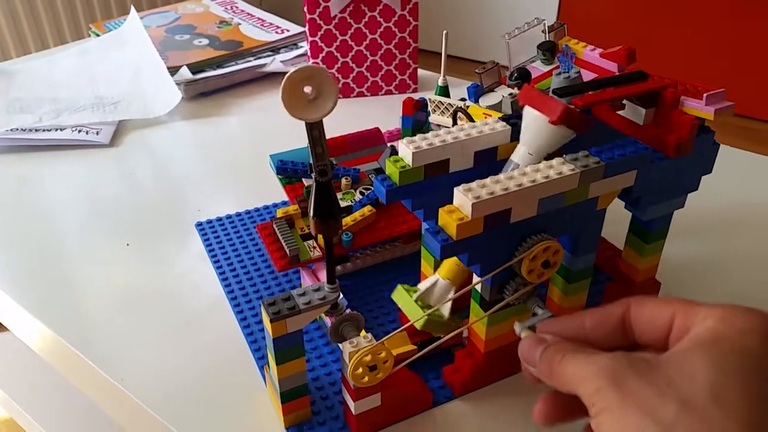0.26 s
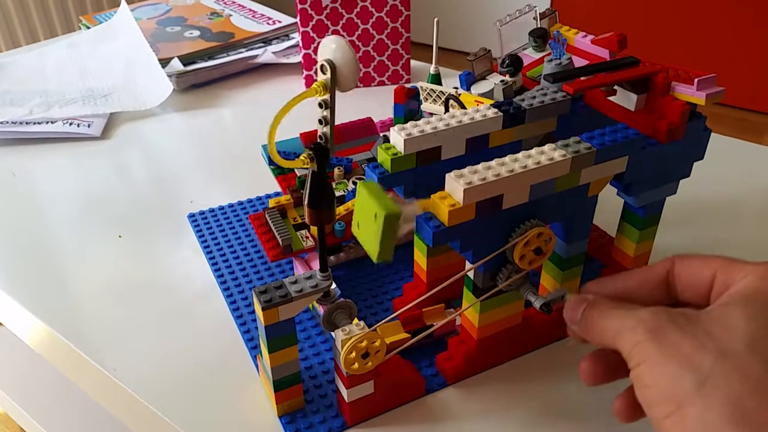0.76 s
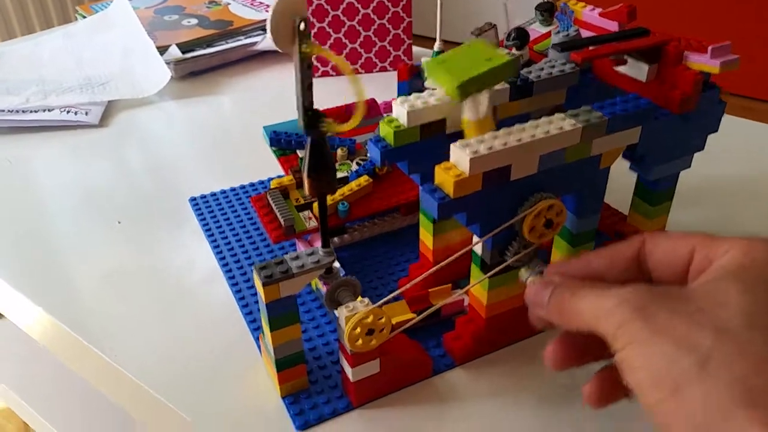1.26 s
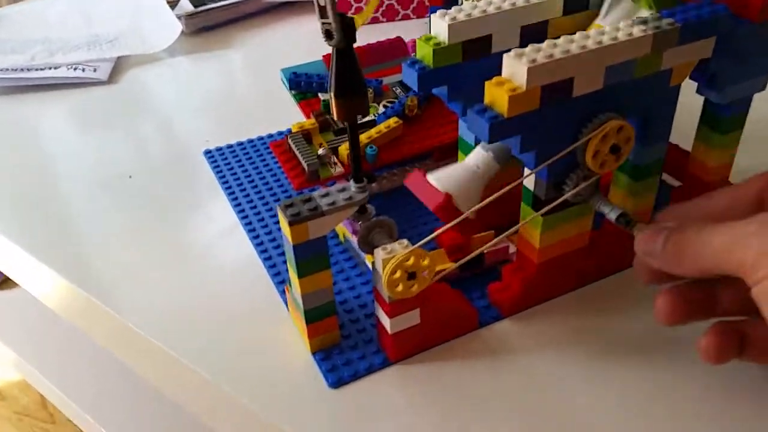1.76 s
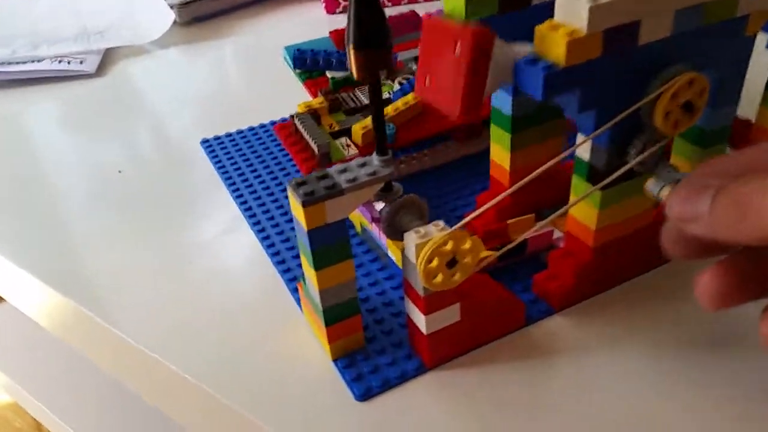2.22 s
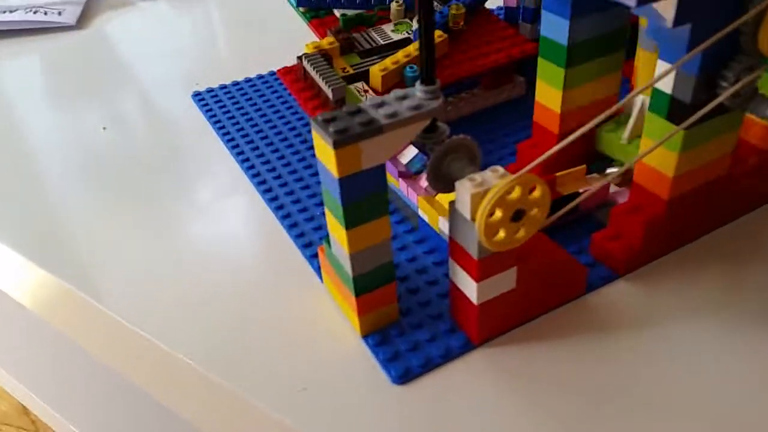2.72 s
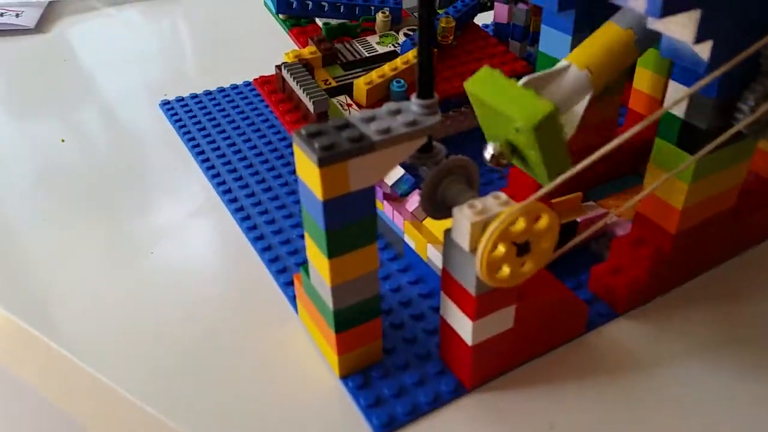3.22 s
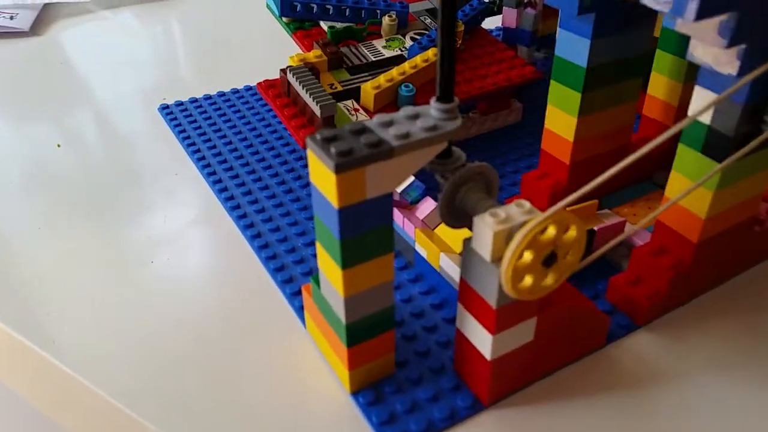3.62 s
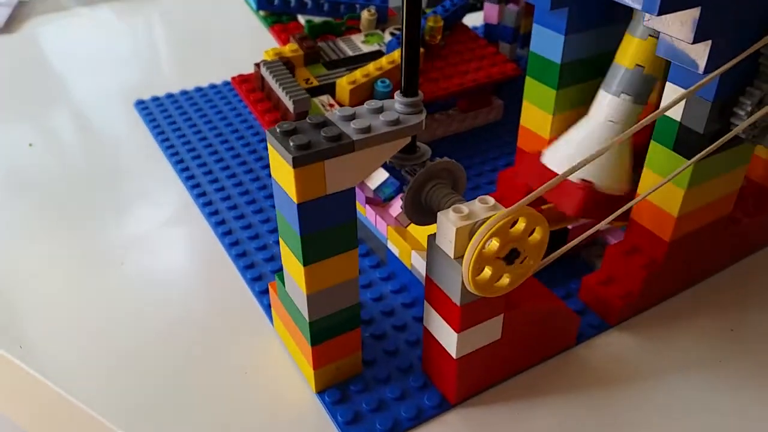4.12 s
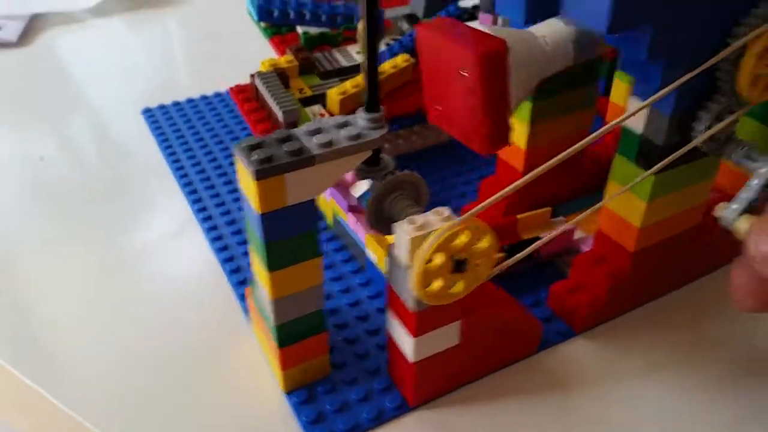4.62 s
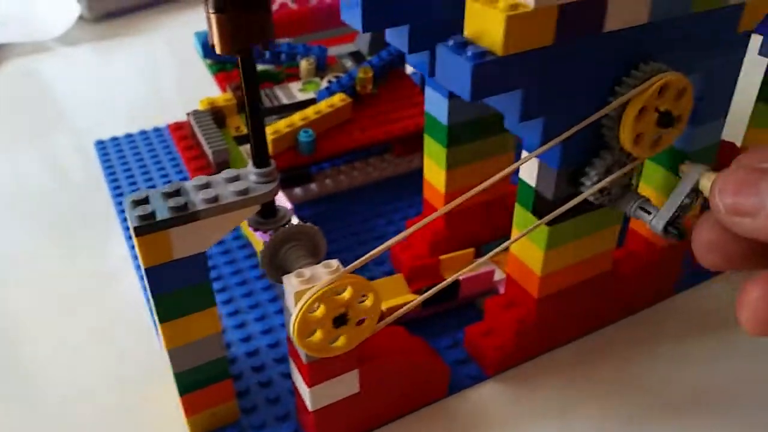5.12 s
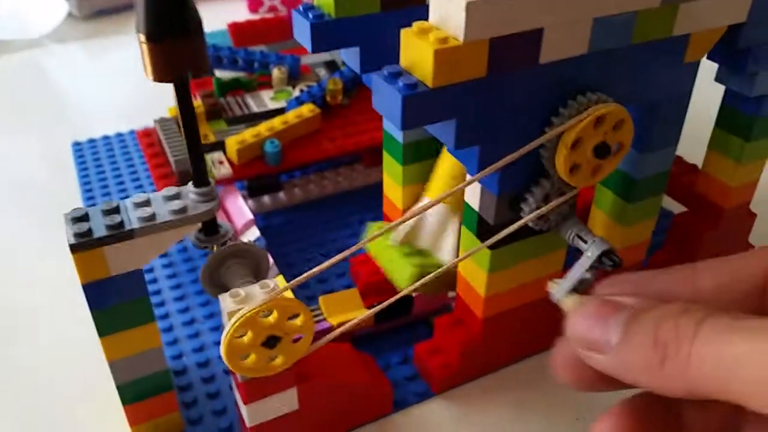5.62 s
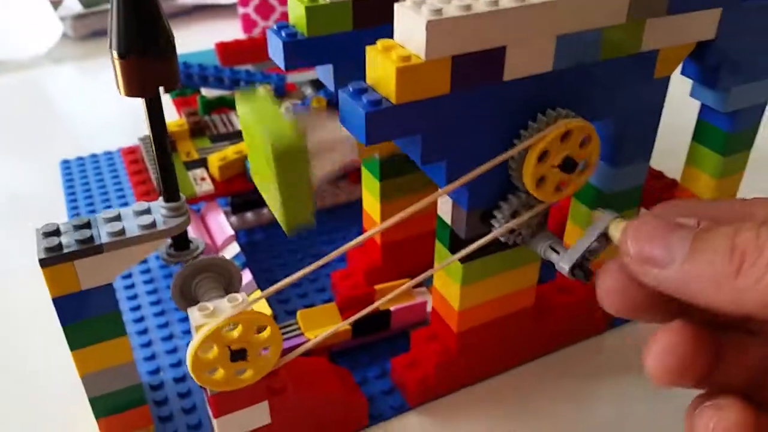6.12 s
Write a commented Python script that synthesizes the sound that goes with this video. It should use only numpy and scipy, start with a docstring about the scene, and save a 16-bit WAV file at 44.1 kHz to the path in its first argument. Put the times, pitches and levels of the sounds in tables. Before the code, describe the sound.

Close-up rattling of a cranked plastic brick mechanism: scattered clacks, a dense burst of dry raps, a near-quiet stretch, then squeaky clatter again.

```python
"""Plastic hammers knock, clack and rebound on a toy-brick machine cranked by hand in a small room, close by.
Gear teeth tick, axles rub and sliding hammers squeak between the blows; a low rumble and faint hiss lie below.
Blows are decaying noise bursts through resonances, with a diffuse room tail; plate and knocks are decaying sines.
Squeaks are narrow-band noise; gears and axles are slip-modulated noise; rumble and hiss are shaped noise."""
import sys
import numpy as np
from scipy import signal
from scipy.fft import rfft, irfft
from scipy.io import wavfile

SR = 44100
rng = np.random.default_rng(int(sys.argv[2]) if len(sys.argv) > 2 else 0)


def wrap_up_sound(samples):
    """Save the sound to the file named by the first command line argument, as 16-bit audio."""
    columns = np.atleast_2d(samples).T
    # keep every value between -1 and 1, then stretch to whole-number steps
    tamed = np.clip(columns, -1, 1)
    steps = np.round(tamed * 32767).astype(np.int16)
    wavfile.write(sys.argv[1], SR, steps)


N = 280917
CUTOFF_HZ = 16000
SIDES = np.array([[1], [-1]])   # left, right

# blows: t/s, level/dB, weight/dB, brightness/dB, pan/dB (x0.52 per side), hollow f/Hz, ping f/Hz,
# first rebound gap/s, change per rebound/dB
# short, dry raps on the bricks
RAPS = [(1.9602, -16, -4, 5, 1, 870, 3180, .023, -7.5), (1.993, -23, -2.5, 2.5, -1, 870, 3080, 0.018, -5.5),
        (2.032, -27, -5.5, 1, 1, 2280, 3070, 0.011, -7.5),
        (2.092, -17, -7.5, 1.5, -0.5, 1080, 3800, .013, -19.5),
        (2.175, -16.5, -2.5, 1, -2, 1310, 3360, 0.015, -10),
        (2.204, -30, -1, -9.5, -4, 1240, 3290, .019, -3), (2.243, -28.5, -7, -5, 0, 830, 3100, .015, -19),
        (2.365, -21, 0.5, -5, 2, 1660, 3630, .012, -10.5),
        (2.466, -34.5, 10.5, 6.5, 3.5, 837, 4500, .017, -8.5),
        (2.541, -22, -7, -0.5, 0.5, 820, 4370, 0.032, -14.5),
        (2.59, -31, -3.5, 3.5, -2, 820, 4570, .048, -10), (2.69, -30.5, -5, -5, 3.5, 1410, 5000, .012, -6),
        (2.78, -31.5, 1, -4, -0.5, 810, 3040, .015, -18),
        (2.825, -24, 1, -7.5, -2.5, 820, 3000, 0.013, -18), (2.966, -28, 0, 2, 3.5, 783, 11200, 0.013, -17)]
# heavy hammer falls with a hollow thunk, same columns
THUNKS = [(4.25, -33, 3, -5.5, -3.5, 870, 3670, 0.017, -19),
          (4.286, -32.5, 3, -2, 1, 885, 6300, 0.017, -26),
          (4.309, -29.5, -5, -1, -3, 420, 7100, 0.017, -7.5),
          (4.424, -36, -6, 2.5, -5, 466, 5900, .008, -9), (4.447, -41.5, -0.5, 5.5, 0, 262, 7200, .02, -27),
          (5.595, -35.5, -3.5, -3.5, 0.5, 447, 3050, 0.046, -8.5)]


def from_db(db):
    """Decibels to amplitude gain."""
    return 10 ** (np.asarray(db) / 20)


def rms_one(x):
    """Scale to unit rms."""
    return x / np.sqrt(np.mean(x ** 2) + 1e-20)


def at_hz(points, hz):
    """Interpolate (f/Hz, value) rows over log frequency."""
    table_hz, values = np.array(points).T
    return np.interp(np.log(hz + 1e-6), np.log(table_hz), values)


def band(x, low_hz, high_hz):
    """Causal Butterworth band-pass."""
    sos = signal.butter(2, [low_hz, high_hz], "band", fs=SR, output="sos")
    return signal.sosfilt(sos, x)


def dying(t, t60):
    """Exponential envelope, -60 dB after t60 seconds."""
    return np.exp(-np.log(1000) * t / np.maximum(t60, 1e-3))


def resonate(x, hz, width_hz):
    """Two-pole resonance with gain 1 at its top."""
    r = np.exp(-np.pi * width_hz / SR)
    b = [(1 - r * r) / 2, 0, (r * r - 1) / 2]
    a = [1, -2 * r * np.cos(2 * np.pi * hz / SR), r * r]
    return signal.lfilter(b, a, x)


def contacts(tap_db, crack_db, rebound_db, crack_t60, blow_s):
    """A contact is a hard tap and crack, then the dense, damped ringing of many joined bricks."""
    # frequency zones: low f/Hz, high f/Hz, gain/dB, ring length factor, side share, room/dB
    zones = [(136, 610, -2, 1.53, 0.052, -7.5), (670, 1527, -4, 1.3, 0.41, -10.5),
             (1143, 2390, -5.5, 0.88, 0.96, -9), (3190, 6140, -4, 0.71, 1, -8.5),
             (7200, 16000, -6, 0.38, 0.91, -7.5)]
    hits = strikes()
    t = np.arange(SR // 14) / SR
    times, *zones_db, pan_db, ring_t60, hollow_hz, ping_hz = hits.T
    pan = from_db(0.52 * pan_db[:, None, None] * SIDES)
    # loose pieces touch twice within milliseconds
    since = t - rng.uniform(0.0013, 0.0062, (len(hits), 1, 1))
    second_touch = from_db(rebound_db) * (since > 0) * dying(np.abs(since), crack_t60)
    crack = from_db(crack_db) * dying(t, crack_t60)
    unevenness = flicker(t, count=len(hits))
    out = np.zeros((2, N))
    for zone_db, (low, high, gain_db, ring_factor, side_share, room_db) in zip(zones_db, zones):
        mid, side = np.moveaxis(rng.standard_normal((len(hits), 2, 1, len(t))), 1, 0)
        ringing = unevenness * dying(t, ring_factor * ring_t60[:, None, None])
        force = (mid + side_share * side * SIDES) * (crack + second_touch + ringing) + 1e-18
        force[:, :, 0] += from_db(tap_db)
        force = np.array([piece(*struck) for struck in zip(force, hollow_hz, ping_hz)])
        blows = band(frame(force, low, high), low, high)
        # level blows by rms weighted to their first moments
        power = np.mean(blows ** 2, axis=1)
        strength = np.sqrt(np.average(power, axis=1, weights=np.exp(-(t / blow_s) ** 2)))
        blows = blows * pan * (from_db(zone_db + gain_db) / strength)[:, None, None]
        direct = np.zeros((2, N + len(t)))
        for s, blow in zip(times, blows):
            start = np.clip(round(s * SR), 0, N)
            direct[:, start:start + len(t)] += blow
        direct = direct[:, :N]
        out += direct + from_db(room_db) * room(direct, np.sqrt(low * high), side_share)
    return out


def strikes(rebound_count=2, gap_shrink=.9, rebound_octaves=.15, tick_hz=1080, tick_ping_hz=2970):
    """Blows with rebounds on other spots, and ticks: t/s, five zone levels/dB, pan/dB, t60/s, hollow f/Hz, ping f/Hz."""
    # contact kinds: thud, knock, clack, click, snap level/dB, ring t60/s (before zone factor)
    drop = (-4, -1, 0, -9.5, -10.5, 0.11)
    thunk = (-1.5, -2.5, -10, -5.5, -4, 0.07)
    clack = (-12.5, -6.5, 0, -9.5, -11.5, 0.13)
    rap = (-12.5, 0, 1.5, -13.5, -19, 0.0158)
    snap = (-14, -4.5, 0, -3, -3.5, 0.03)
    tick = (-3.5, -5, -0.5, -8, -22.5, 0.11)
    # hammers drop and clatter; loose pieces clack and ring; edges snap on edges: columns as RAPS
    drops = [(1.228, -24, -5, 2, 1.5, 850, 5150, 0.034, -9.5),
             (1.485, -32, -2, -9, 2, 480, 6100, 0.015, -24),
             (1.65, -44.5, 4, -4.5, 3.5, 456, 3410, .012, -14.5),
             (1.67, -36, 5.5, -19, 3.5, 428, 2960, .02, -12.5),
             (1.769, -39, 8.5, 2, -1.5, 438, 4200, .033, -14),
             (5.478, -27, -0.5, -0.5, -1.5, 843, 4880, 0.03, -10.5)]
    clacks = [(.003, -30, 1, 3, -2, 1040, 3130, .044, -10.5),
              (0.569, -20.5, 1.5, -8, -0.5, 1533, 4960, .004, -5.5),
              (.742, -20, -6, 3, 2, 1700, 6330, 0.0097, -28),
              (.758, -32.5, 4, -3, 0, 1870, 5390, .012, -16),
              (0.84, -25.5, -29, 3, -1, 1850, 5760, .01, -32),
              (1.691, -32, 4.5, 5, 5.5, 1915, 8100, 0.0092, -20),
              (1.868, -22, -3.5, -1.5, 1.5, 2320, 3570, .019, -12.5),
              (5.87, -29, 1.5, -3, 1, 2090, 3180, .046, -7),
              (6.008, -21, 3, -1.5, -3.5, 2040, 4130, .021, -22),
              (6.028, -29.5, -3.5, 7, 3.5, 1370, 3150, .012, -25),
              (6.097, -21, -2, 5.5, -2, 1880, 6600, .037, -12.5),
              (6.167, -29, -2, 1.5, 3.5, 1390, 3330, .015, -13),
              (6.338, -23, 4, 1, -1.5, 422, 4330, .016, -6)]
    snaps = [(1.736, -39, 2, -1, 9.5, 507, 8400, 0.023, -8),
             (1.802, -43.5, 1, 0.5, 2, 336, 3140, 0.017, -19),
             (2.838, -24, -4, 7.5, -1.5, 363, 5535, .012, -18.5),
             (2.948, -22.5, -2, -4.5, 0.5, 770, 5040, .018, -21),
             (2.998, -24, -1.5, -3, 1, 1410, 10900, .02, -24.5)]
    # light ticks of gear teeth: t/s, level/dB, pan/dB (x0.52 per side)
    ticks = [(.233, -40, 1), (.256, -42, 7), (1.067, -44, -2), (1.161, -46.5, 5), (1.434, -40.5, 4),
             (1.571, -41, -1), (1.758, -38, 5), (1.848, -45, 9), (2.156, -45, 6), (2.454, -37, 0),
             (2.638, -45, 0.5), (3.355, -48.5, 0), (3.473, -56, 5.5), (4.406, -42.5, 0),
             (4.528, -51.5, -16.5), (5.706, -42, -1), (5.764, -37, 4.5), (5.96, -48, -5), (6.328, -33.5, 3)]
    # how far each of the five zones follows a blow's weight and brightness: dB per dB
    weight_shares = np.array((.8, 0.9, 0.048, 0.0058, 0.34))
    bright_shares = np.array((0.25, 0, 0.04, 1.31, 1))
    rows = []
    kinds = (drop, drops), (thunk, THUNKS), (clack, clacks), (rap, RAPS), (snap, snaps)
    for (*zones_db, t60), blows in kinds:
        for s, level_db, weight_db, bright_db, pan_db, hollow_hz, ping_hz, gap_s, change_db in blows:
            colour_db = zones_db + weight_db * weight_shares + bright_db * bright_shares
            octaves = rebound_octaves * rng.standard_normal(rebound_count).clip(-2, 2)
            for k, shift in enumerate([1, *2 ** octaves]):
                hit_db = level_db + k * change_db + colour_db
                rows.append((s, *hit_db, pan_db, t60, hollow_hz * shift, ping_hz * shift))
                s += gap_s * gap_shrink ** k
    *zones_db, t60 = tick
    for s, level_db, pan_db in ticks + jiggles():
        rows.append((s, *np.add(zones_db, level_db), pan_db, t60, tick_hz, tick_ping_hz))
    return np.array(rows)


def jiggles(count=2, relative_db=-18.5, spread_db=2.5, mean_delay_s=.035):
    """Each rap shakes loose bricks, which tick shortly after: t/s, level/dB, pan/dB."""
    rows = []
    for s, level_db, _, _, pan_db, *_ in RAPS:
        for _ in range(count):
            tick_s = s + mean_delay_s * rng.uniform(0, 2)
            tick_db = level_db + relative_db + spread_db * rng.standard_normal()
            rows.append((tick_s, tick_db, pan_db))
    return rows


def flicker(t, count, depth_db=2.5, step_s=.002):
    """Each ringing swells and sinks at random every few milliseconds."""
    steps_s = np.arange(64) * step_s
    swings = rng.standard_normal((count, len(steps_s)))
    return np.array([[from_db(depth_db * np.interp(t, steps_s, row))] for row in swings])


def piece(force, hollow_hz, ping_hz, hollow_db=9, ping_db=6, overtone_db=6, hollow_q=12, ping_q=11):
    """Struck plastic adds a damped hollow note, a ping and three overtones drawn afresh each time."""
    out = force + from_db(hollow_db) * resonate(force, hollow_hz, hollow_hz / hollow_q)
    out += from_db(ping_db) * resonate(force, ping_hz, ping_hz / ping_q)
    for hz in rng.uniform(2360, 13500, size=3):
        out += from_db(overtone_db) * resonate(force, hz, hz / (2 * ping_q))
    return out


def frame(force, low_hz, high_hz, spread_db=2):
    """The hollow frame passes the force on and rings in this zone's modes, varied in strength per blow."""
    # frame resonances: f/Hz, width/Hz, mean lift/dB
    resonances = [(185, 48, 9), (261.5, 3.3, 4), (370, 40, 3.5), (446, 40, 8.5), (895, 50, 5.5),
                  (1210, 120, -6), (1590, 100, -2.5), (1980, 41, -4.5), (3140, 53, -9.5), (5200, 480, -24),
                  (7770, 960, 0.5), (11400, 670, -11)]
    out = force.copy()
    strengths_db = spread_db * rng.standard_normal((len(force), len(resonances)))
    for (hz, width_hz, lift_db), own_db in zip(resonances, strengths_db.T):
        if low_hz < hz < high_hz:
            out += resonate(force, hz, width_hz) * from_db(lift_db + own_db)[:, None, None]
    return out


def room(x, hz, side_share, build_s=0.00067):
    """A diffuse noise tail builds up and decays; unit mean energy per channel."""
    # reverberation: f/Hz, t60/s
    room_t60 = [(150, 0.2), (1000, 0.18), (3000, .44), (6000, 0.33), (14000, 0.13)]
    t = np.arange(SR // 2) / SR
    mid, side = rng.standard_normal((2, len(t)))
    envelope = dying(t, at_hz(room_t60, hz)) * (1 - np.exp(-t / build_s))
    tail = (mid + side_share * side * SIDES) * envelope
    return signal.fftconvolve(x, rms_one(tail) / np.sqrt(len(t)), axes=1)[:, :N]


def plate(relative_db=-1, spread_db=1.3):
    """Each thunk rings the base plate's low modes, each with a strength of its own."""
    # plate modes: f/Hz, mean level/dB (rel. to thunk level + weight + relative_db), t60/s
    hz, mode_db, t60 = np.transpose([(269, -9, 0.37), (342, -5.5, 0.19), (426, -9.5, .1), (483, -11, 0.19),
                                     (876, -7, 0.079)])[:, :, None]
    out = np.zeros(N)
    t = np.arange(SR // 3) / SR
    for s, level_db, weight_db, *_ in THUNKS:
        own_db = spread_db * rng.standard_normal(hz.shape)
        gain = from_db(level_db + weight_db + relative_db + mode_db + own_db)
        modes = gain * np.sin(2 * np.pi * hz * t) * dying(t, t60)
        start = round(s * SR)
        out[start:start + len(t)] += modes.sum(axis=0)
    return out


def knocks(knock_t60=0.0055, thump_hz=135, thump_t60=0.042, rise_s=0.00081):
    """Soft handling knocks: a few cycles of a hollow note over a low thump."""
    # dull knocks: t/s, note f/Hz, note level/dB (before +7 left, -2 right), thump level/dB
    knock_rows = [(3.099, 860, -23, -27.5), (3.155, 960, -33, -48), (3.196, 890, -27.5, -32.5),
                  (3.333, 895, -30, -37), (4.758, 1125, -23.5, -29.5), (4.801, 970, -22.5, -24.5),
                  (5.736, 1210, -31, -43), (5.798, 1060, -24, -29), (5.832, 980, -26.5, -25.5)]
    out = np.zeros((2, N))
    t = np.arange(SR // 5) / SR
    for s, hz, knock_db, thump_db in knock_rows:
        note = from_db(knock_db) * np.sin(2 * np.pi * hz * t) * dying(t, knock_t60)
        thump = from_db(thump_db) * np.sin(2 * np.pi * thump_hz * t) * dying(t, thump_t60)
        start = round(s * SR)
        out[:, start:start + len(t)] += (note * from_db([[7], [-2]]) + thump) * (1 - np.exp(-t / rise_s))
    return out


def squeaks(upper_ratio=1.55):
    """Sliding hammers squeak roughly in two resonances; the low squeak has one."""
    # hammer squeaks, one table each: t/s, f/Hz, level/dB (before mix gain)
    hammer_squeaks = [
        [(.6, 1810, -49), (.72, 1817, -50), (.77, 1777, -37), (.81, 1830, -65), (.85, 1980, -56),
         (.93, 1840, -41)],
        [(5.75, 2080, -39), (5.84, 2090, -50.5), (5.9, 2110, -50), (5.96, 2000, -38), (6.06, 2020, -87),
         (6.15, 1817, -45), (6.21, 1755, -42), (6.31, 1755, -55)],
    ]
    # softer, lower squeak: t/s, f/Hz, level/dB (before mix gain)
    low_squeak = [(1.06, 990, -45), (1.12, 1000, -41), (1.21, 992, -35)]
    main, upper = 0, 0
    for rows in hammer_squeaks:
        main = main + squeak(rows, width_hz=190)
        upper_rows = [(s, upper_ratio * hz, db) for s, hz, db in rows]
        upper = upper + squeak(upper_rows, width_hz=600)
    low = squeak(low_squeak, width_hz=85)
    return from_db(-2) * main + from_db(-16.5) * upper + from_db(-6) * low


def squeak(rows, width_hz, fade_s=0.018):
    """Uneven stick-slip keeps one narrow resonance going: low-passed noise on a gliding carrier."""
    t = np.arange(N) / SR
    s, hz, level_db = np.transpose(rows)
    gate = np.clip(np.minimum(t - s[0], s[-1] - t) / fade_s, 0, 1)
    slips = rng.standard_normal((2, N)) + 1j * rng.standard_normal((2, N))
    wobble = signal.sosfilt(signal.butter(2, width_hz / 2, fs=SR, output="sos"), slips)
    phase = 2 * np.pi * np.cumsum(np.interp(t, s, hz)) / SR
    tone = np.real(wobble * np.exp(1j * phase))
    return rms_one(tone) * gate * from_db(np.interp(t, s, level_db))


def gears(rolling_db):
    """Rolling gears: sparse slips over mostly smooth noise."""
    # rolling spectrum: f/Hz, relative density/dB per Hz
    rolling = [(120, -19), (200, 5.5), (318, -5.5), (395, -7.5), (427, -2), (457, -5), (1060, -5.5),
               (1360, -17), (3000, -32), (3900, -52), (6600, -120)]
    return from_db(rolling_db + 2.5) * friction(rolling, slips_per_s=81, size_db=-2.5, smooth=3.3)


def axles(rubbing_db):
    """Rubbing axles: dense slips over sliding noise."""
    # rubbing spectrum: f/Hz, relative density/dB per Hz
    rubbing = [(710, -27), (1200, 5.5), (1590, 3.5), (2100, -0.5), (2720, -4.5), (3140, -7), (3960, -9.5),
               (7700, -28), (9160, -30), (12000, -20.5), (15600, -44.5), (22000, -120)]
    return from_db(rubbing_db + 0.5) * friction(rubbing, slips_per_s=400, size_db=8.0, smooth=0.94)


def friction(spectrum, slips_per_s, size_db, smooth):
    """Tiny plastic slips of uneven size modulate noise over a smooth sliding floor."""
    sizes_db = size_db * np.minimum(rng.exponential(1, N), 4)
    slips = (rng.random(N) < slips_per_s / SR) * from_db(sizes_db)
    shaking = signal.lfilter([1], [1, -np.exp(-1 / (0.0072 * SR))], slips)   # 7.2 ms decay
    return coloured(rng.standard_normal((2, N)) * (smooth + rms_one(shaking)), spectrum)


def coloured(source, spectrum):
    """Shape two unrelated signals into a stereo pair, more alike in the bass; rms 1."""
    # channel likeness: f/Hz, correlation
    likeness = [(40, 0.87), (200, 0.92), (600, 0.11), (1500, 0.083), (5000, 0.043)]
    hz = np.fft.rfftfreq(N, 1 / SR)
    alike = np.clip(at_hz(likeness, hz), 0, 1)
    inside = (hz > spectrum[0][0]) * (hz < spectrum[-1][0])
    mid, side = rfft(source) * from_db(at_hz(spectrum, hz)) * inside
    return rms_one(irfft(np.sqrt(1 + alike) * mid + np.sqrt(1 - alike) * side * SIDES, N))


def rumble(rolling_db, mean_effort_db=-48.5, follow_share=.4):
    """Low handling and room noise partly follows the gears' level swing in dB."""
    # rumble spectrum: f/Hz, relative density/dB per Hz
    spectrum = [(12, -44.5), (20, -14), (37, -3), (59, -1), (97, 3.5), (114, 2), (140, -3), (214, -4.5),
                (275, -16.5), (307, -9), (400, -16.5), (520, -49), (880, -120)]
    level_db = mean_effort_db + follow_share * (rolling_db - rolling_db.mean())
    return from_db(level_db) * coloured(rng.standard_normal((2, N)), spectrum)


def hiss(level_db=-76):
    """Faint steady shaped noise."""
    # hiss spectrum: f/Hz, relative density/dB per Hz
    spectrum = [(880, -29), (1500, -9.5), (1550, -4), (3280, -16), (4460, -8), (5710, -20.5), (10300, -32),
                (13100, -14), (16000, -15.5)]
    return from_db(level_db) * coloured(rng.standard_normal((2, N)), spectrum)


def scene():
    """Blows, plate, knocks and squeaks over turning gears, axles, rumble and hiss."""
    # cranking: t/s, gear rolling level/dB (before +2.5), axle rubbing level/dB (before +0.5)
    s, *columns = np.transpose([(0.0, -50.5, -52), (0.6, -48.5, -65), (0.74, -47, -49), (0.9, -54, -60),
                                (1.21, -50, -57.5), (1.65, -50.5, -55.5), (2.06, -45.5, -50),
                                (2.5, -50.5, -74), (2.87, -50.5, -52), (3.12, -54, -60.5), (3.49, -56, -76),
                                (4.28, -58.5, -77), (4.43, -54.5, -53), (5.02, -60, -81.5),
                                (5.52, -58.5, -77), (5.64, -54, -59), (6.01, -49.5, -56),
                                (6.37, -53.5, -59)])
    rolling_db, rubbing_db = [np.interp(np.arange(N) / SR, s, column) for column in columns]
    blows = contacts(tap_db=11.5, crack_db=-7, rebound_db=-13.0, crack_t60=0.0097, blow_s=0.0062)
    events = blows + plate() + knocks() + squeaks()
    return events + gears(rolling_db) + axles(rubbing_db) + rumble(rolling_db) + hiss()


def record(dry):
    """Two microphone ports colour the sound differently; an elliptic low-pass cuts the top."""
    # microphone ports: f/Hz, left-right difference/dB
    ports = [(60, 3.5), (250, 0.5), (700, 0.7), (1500, 4), (2400, 1), (3400, -3), (5400, -5), (7200, -3),
             (8100, 9), (10000, 5.5), (15000, 4)]
    hz = np.fft.rfftfreq(2 * N, 1 / SR)
    heard = irfft(rfft(dry, 2 * N) * from_db(at_hz(ports, hz) * SIDES / 2))[:, :N]
    return signal.sosfilt(signal.ellip(10, .2, 80, CUTOFF_HZ, fs=SR, output="sos"), heard)


dry = scene()
out = record(dry)
wrap_up_sound(out)
```